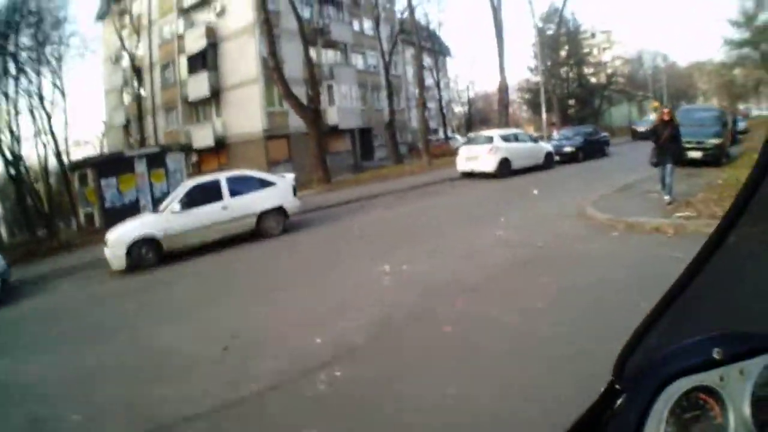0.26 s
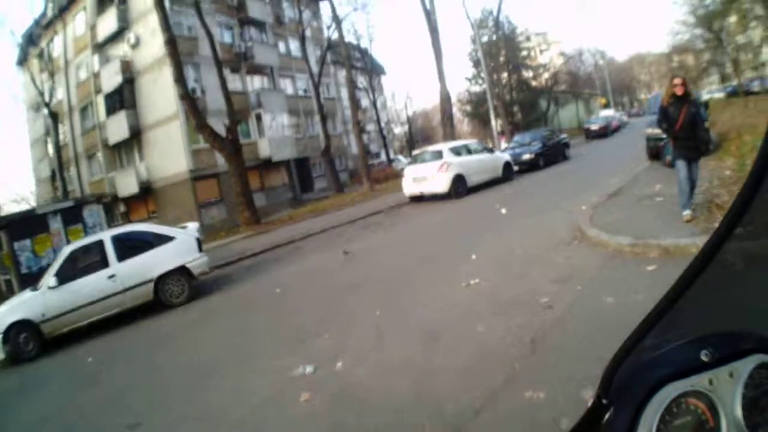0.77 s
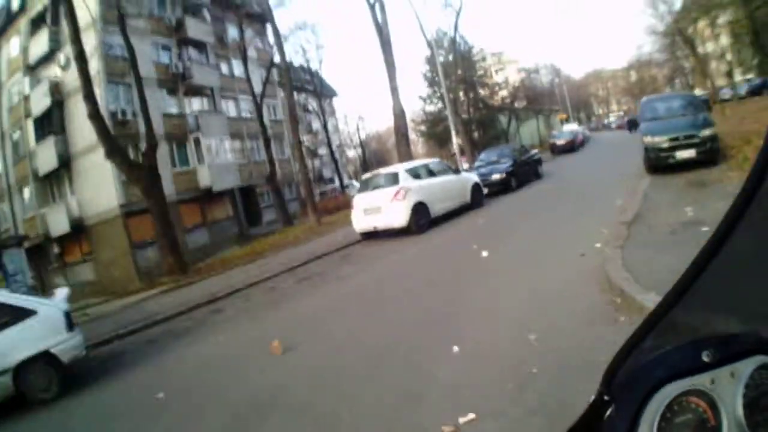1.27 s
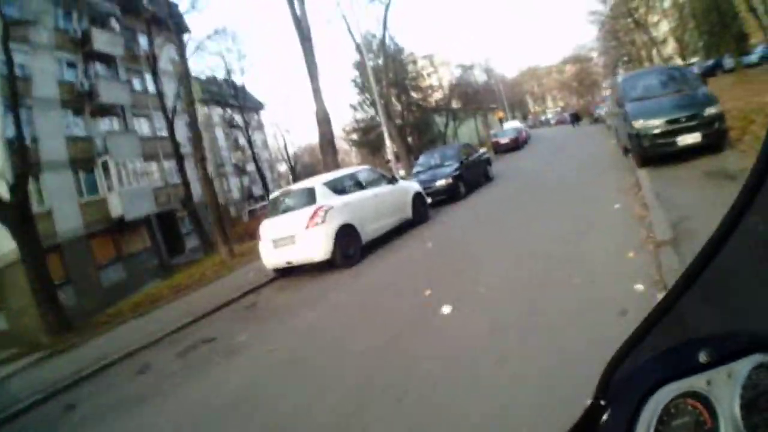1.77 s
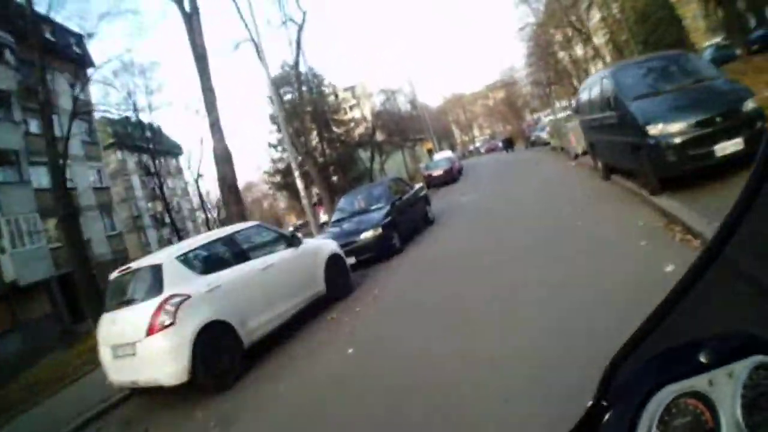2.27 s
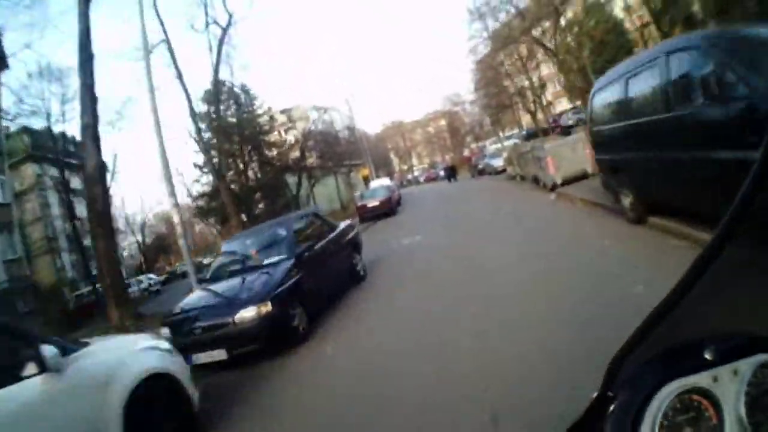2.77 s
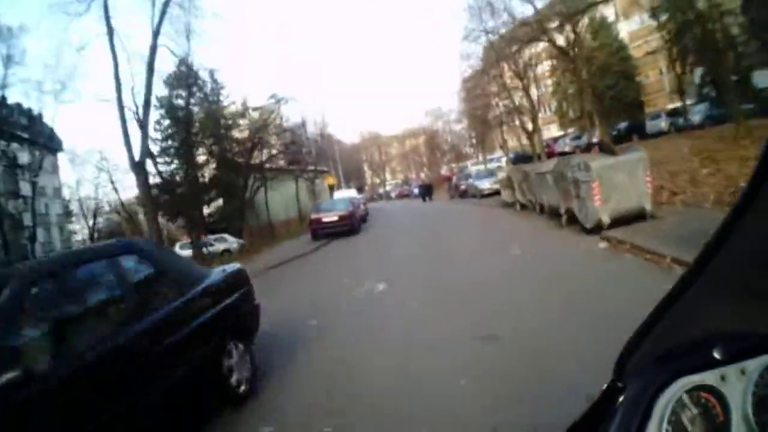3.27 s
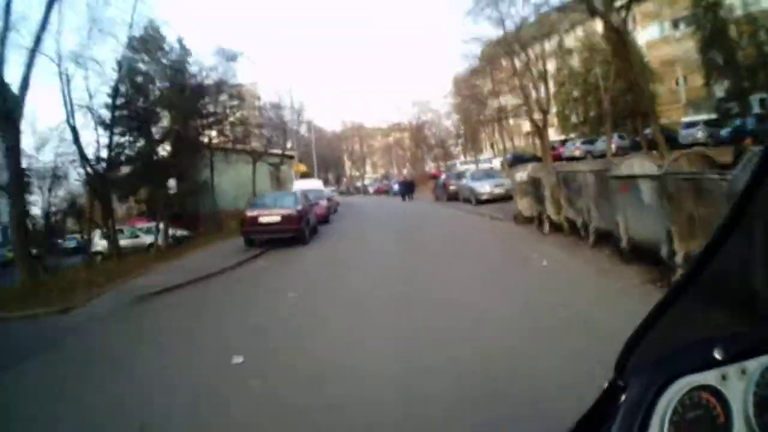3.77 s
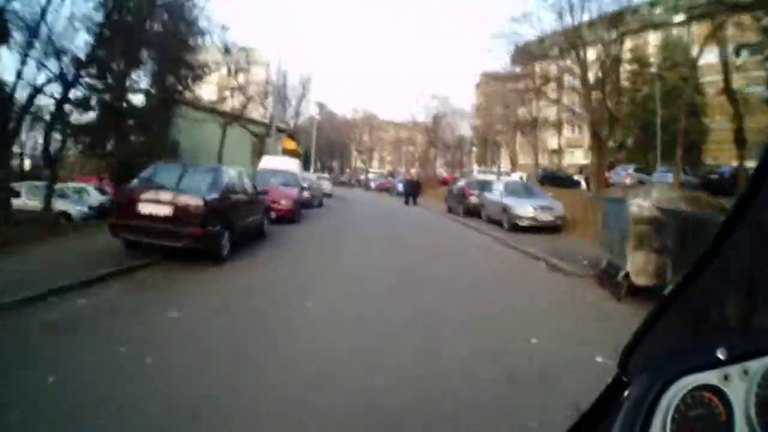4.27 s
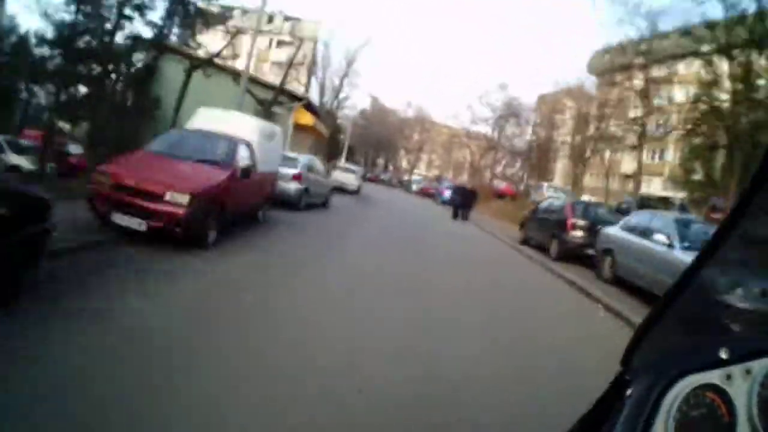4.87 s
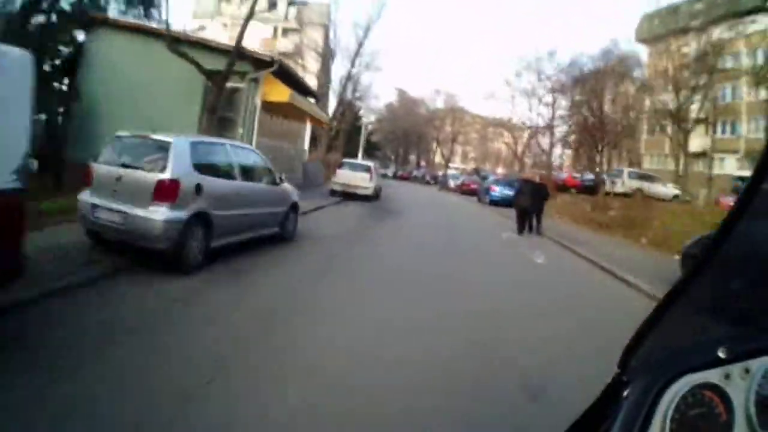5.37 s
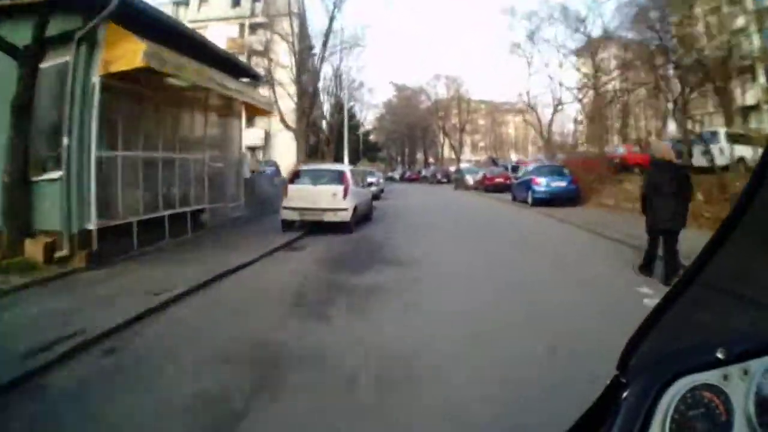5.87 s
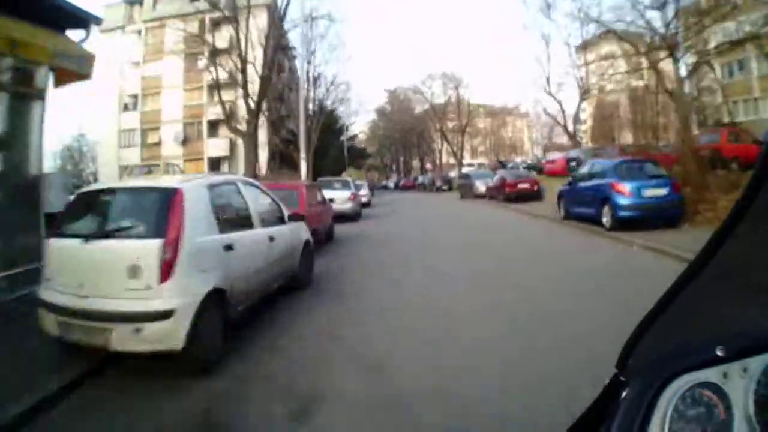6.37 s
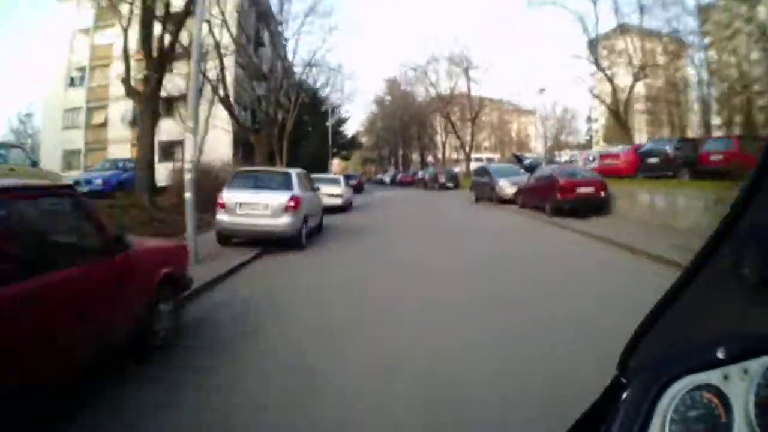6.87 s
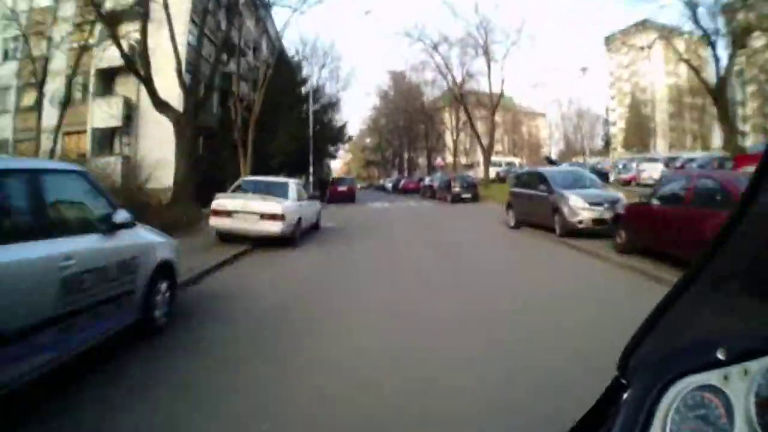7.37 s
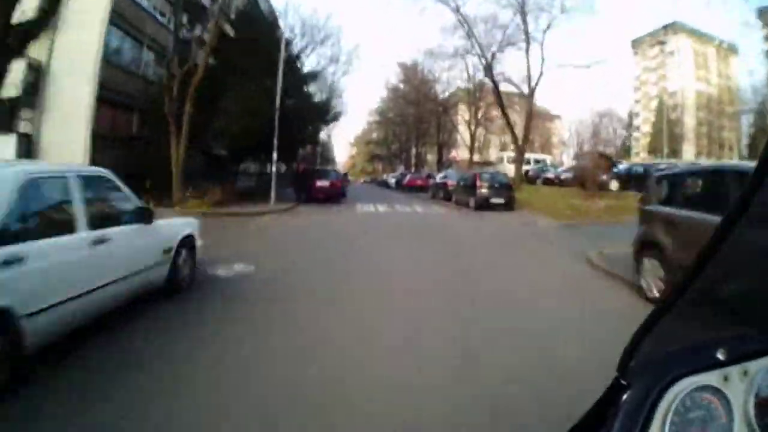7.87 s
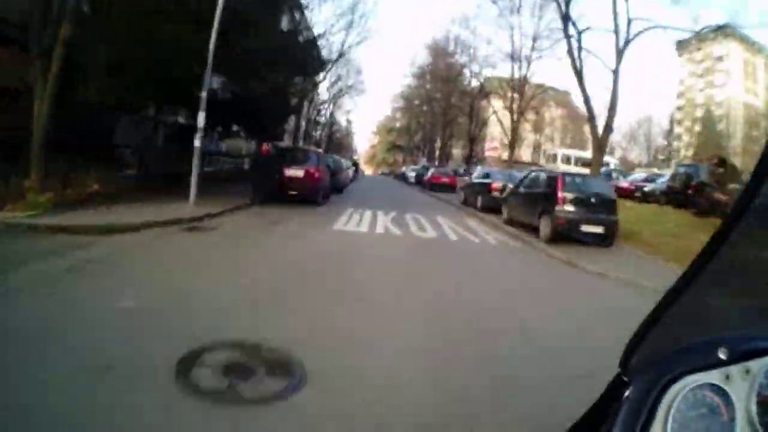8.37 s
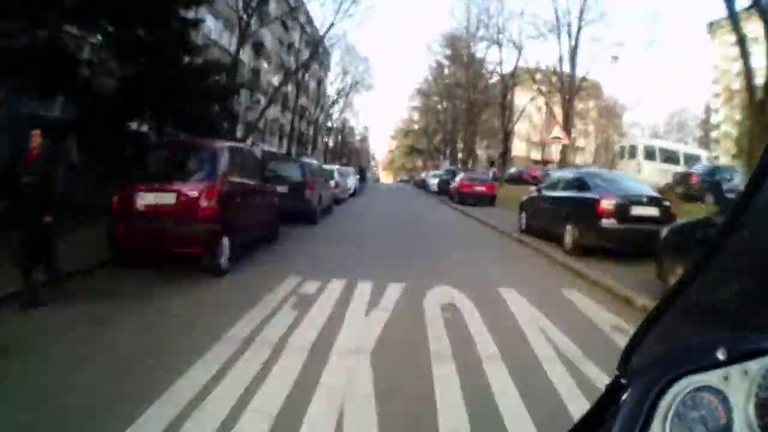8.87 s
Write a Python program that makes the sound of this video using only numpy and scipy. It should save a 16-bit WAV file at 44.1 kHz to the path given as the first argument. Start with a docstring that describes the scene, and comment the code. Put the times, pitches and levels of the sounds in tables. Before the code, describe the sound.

A single-cylinder motorcycle idles, clunks into gear and pulls away, its engine clattering and whining as wind buffets the microphone.

```python
"""On a street, from the rider's seat: a single-cylinder four-stroke motorcycle idles, clunks into gear
and pulls away. Each firing thumps through the pipe, the piston shakes the frame, the engine clatters
and rasps, and the gears whine hardest under load. The throttle shuts twice and a rough patch jolts
the bike. Wind buffets the microphone as speed builds, and the loudest peaks overload it."""
import sys
import numpy as np
from scipy import signal
from scipy.fft import rfft, irfft
from scipy.io import wavfile

SR = 44100
rng = np.random.default_rng(int(sys.argv[2]) if len(sys.argv) > 2 else 0)


def wav_out(sig):
    """Save sig, one row per channel (or a flat mono array), as 16-bit PCM at SR to the path in sys.argv[1]."""
    wavfile.write(sys.argv[1], SR, np.round(np.clip(np.atleast_2d(sig).T, -1, 1) * 32767).astype(np.int16))


N = 401751
TIME = np.arange(N) / SR
IDLE_RATE = 12.5  # firings per second; the crank turns twice for each firing


def amp(db):
    """Decibels to gain."""
    return 10 ** (np.asarray(db) / 20)


def unit_rms(x):
    """Scales to rms 1."""
    return x / np.sqrt(np.mean(x ** 2) + 1e-20)


def automation(rows):
    """Joins (seconds, value) rows into a curve, sample by sample."""
    return np.interp(TIME, *np.transpose(rows))


def colour(x, points):
    """Equalises by a curve of (Hz, dB) points; rms 1."""
    hz, db = np.transpose(points)
    f = np.fft.rfftfreq(len(x), 1 / SR)
    gain = amp(np.interp(np.log(f + 1), np.log(hz), db))
    return unit_rms(irfft(rfft(x) * gain, len(x)))


def wander(rate_hz):
    """Slow random drift of rms 1."""
    f = np.fft.rfftfreq(N, 1 / SR)
    return unit_rms(irfft(rfft(rng.standard_normal(N)) / (1 + (f / rate_hz) ** 4), N))


def resonate(x, hz, width_hz):
    """Two passes through a resonance whose pitch may glide."""
    turn = np.exp(2j * np.pi * np.cumsum(hz * np.ones(len(x))) / SR)
    pole = np.exp(-np.pi * width_hz / SR)
    for _ in range(2):
        x = 2 * (turn * signal.lfilter([1 - pole], [1, -pole], x / turn)).real
    return x


def nearness(hz, centre_hz, width_hz):
    """1 at the centre of a resonance, falling to 0 away from it."""
    return 1 / (1 + (2 * (hz - centre_hz) / width_hz) ** 2)


def strike(start, db, t60):
    """A hit's envelope: instant attack, then 60 dB of decay in t60 seconds."""
    return (TIME >= start) * amp(db - 60 * np.maximum(TIME - start, 0) / t60)


def loudness(law, rate, throttle):
    """A source's level in dB, rising with engine speed and with throttle."""
    idle_db, speed_db, throttle_db = law
    return idle_db + speed_db * (rate - IDLE_RATE) + throttle_db * throttle


def exhaust(cycles, rate, level_db, pull, count=44):
    """The firing pulses as a stack of harmonics, each swelling as it glides through a pipe resonance."""
    # The pipe's broad resonances. Each row: frequency in Hz, gain in dB.
    pipe = [(25, -8), (70, -14), (105, -6), (138, 1), (172, 0), (205, -11), (275, -6), (345, -2),
            (385, -11), (430, -8), (490, -12), (550, -8), (660, -14), (780, -12), (900, -15), (1500, -22)]
    # Sharp resonances that boom under load. Each row: centre in Hz, width in Hz, level in dB.
    booms = [(134.3, 10, -22.5), (170.7, 10, -24), (282, 12, -27), (325, 28, -25), (551, 26, -31.5),
             (774, 35, -33)]
    # Odd harmonics fade as the engine smooths out. Each row: firings per second, gain in dB.
    odd_fade = [(27, -0.5), (32, -7)]
    pipe_hz, pipe_db = np.transpose(pipe)
    odd_gain = amp(np.interp(rate, *np.transpose(odd_fade)))
    stack, boom, power = np.zeros((3, N))
    # the lowest four harmonics stay in step with the crank; the pipe scatters the higher ones
    phases = rng.random(count) * (np.arange(count) > 3)
    for order, phase in enumerate(phases, 1):
        gain = np.interp(order * rate, pipe_hz, amp(pipe_db))
        boom_gain = sum(amp(db) * nearness(order * rate, hz, width) for hz, width, db in booms)
        tone = np.sin(2 * np.pi * (order * cycles + phase)) * (odd_gain if order % 2 else 1)
        stack += gain * tone
        boom += np.sqrt(2) * boom_gain * tone
        power += gain ** 2 / 2
    return (amp(level_db) * stack / np.sqrt(power) + np.maximum(pull, 0) * boom) * amp(wander(13))


def piston_shake(cycles, rate, throttle, pull, throttle_db=3, overrun_db=11):
    """The unbalanced piston drones at once and twice crank speed, loudest where the frame resonates."""
    # How the frame passes on the shake. Each row: frequency in Hz, gain in dB.
    frame = [(24, -41), (31, -28.5), (45, -36.5), (53, -30.5), (61, -25), (70, -24), (80, -38), (102, -34),
             (125, -23), (142, -29)]
    hz, db = np.transpose(frame)
    crank_angle, crank_hz = 4 * np.pi * cycles, 2 * rate
    first_db = np.interp(crank_hz, hz, db) + throttle_db * throttle
    second_db = np.interp(2 * crank_hz, hz, db) + 3 + overrun_db * np.maximum(-pull, 0)
    drone = amp(first_db) * np.sin(crank_angle) + amp(second_db) * np.sin(2 * crank_angle)
    return np.sqrt(2) * drone * amp(0.73 * wander(7))


def knocks(cycles, t60, spread_db=3):
    """Piston slap and valve knocks each ring their own dense casing modes, never twice equally hard."""
    # Each row: position as a share of the cycle, relative level in dB.
    hits = [(.06, -3.5), (.31, -4.5), (.56, -2), (.81, -8)]
    t = np.arange(SR // 10) / SR
    knocking = np.zeros(N)
    for share, db in hits:
        ring = rng.standard_normal(len(t)) * amp(db - 60 * t / t60)
        count = np.floor(cycles - share)
        clicks = np.diff(count, prepend=count[0]) * amp(spread_db * rng.standard_normal(N))
        knocking += signal.oaconvolve(clicks, ring)[:N]
    return unit_rms(knocking)


def stroke_surge(cycles, running, punch):
    """The envelope that pumps the mechanical noise through each four-stroke cycle."""
    # Each row: share of the cycle, idling accent in dB, running accent in dB.
    accents = [(0, -7, -1), (.1, -1, 4), (.24, 3.5, 1), (.38, 2, -1.5), (.55, 0, .5), (.72, .5, -1.5),
               (.87, -3, -3)]
    share, idle_db, run_db = np.transpose(accents)
    idling, pulling = (np.interp(cycles, share, db, period=1) for db in (idle_db, run_db))
    crank_ripple = 0.26 * np.cos(4 * np.pi * (cycles - .06))
    return unit_rms(amp((0.5 - running) * idling + running * punch * (pulling - crank_ripple)))


def clatter(cycles, running, surge, level_db):
    """Knocks and surging mechanical noise; the tone fills out as the revs rise."""
    # The engine's tone idling and running. Each row: frequency in Hz, gain in dB.
    idle_eq = [(100, 5), (160, -12.5), (290, -1), (360, -16.5), (440, -0.5), (640, -12.5), (820, -5.5),
               (950, -2.5), (1200, -2), (1500, -9), (2000, -8.5), (2700, -12), (3300, -21), (5000, -65)]
    run_eq = [(150, -5.5), (300, -1), (480, -1), (660, -1), (780, 1), (860, -0.5), (1200, 2.5), (1650, -2),
              (2000, -4), (2380, -2.5), (2900, -7), (3400, -27.5), (5000, -33.5)]
    grit = rng.standard_normal(N) * amp(wander(130))
    drive = surge * (grit + amp(-5) * knocks(cycles, t60=0.11))
    body = np.sqrt(1 - running) * colour(drive, idle_eq) + np.sqrt(running) * colour(drive, run_eq)
    return amp(level_db) * body


def valve_rasp(cycles, surge, level_db):
    """Bright valve ticks in a gritty hiss."""
    # The rasp's treble band. Each row: frequency in Hz, gain in dB.
    rasp_eq = [(2000, -16.5), (3000, 0.5), (3700, -2), (4150, 4), (4600, 0), (5100, -2), (5500, -15.5),
               (6200, -19.5)]
    hiss = surge * rng.standard_normal(N) * amp(2.38 * wander(180))
    valves = amp(-10.5) * knocks(cycles, t60=0.023)
    return amp(level_db + 1.24) * colour(hiss + valves, rasp_eq)


def gear_whine(cycles, rate, pull, slip, punch, level_db):
    """Meshing teeth whine with the crank, loudest under load; hard power strokes make them chirp."""
    teeth_per_turn, case_hz = 37.93, 1160  # the case's own ring holds the pitch up at idle
    slip_sag, chirp, waver = .14, .06, .007  # shares of the pitch
    stroke_angle = 2 * np.pi * (cycles - .12)
    mesh_hz = np.maximum(case_hz, teeth_per_turn * 2 * rate * (1 - slip_sag * slip))
    hz = mesh_hz * (1 + chirp * punch * np.sin(stroke_angle + 2 * np.pi * .15) + waver * wander(15))
    load_db = np.interp(pull, [0, .35], [-7.5, 0])  # from coasting until the slack is taken up
    fade_db = -0.4214 * (rate - IDLE_RATE)
    flare_db = 2.9 * nearness(mesh_hz, centre_hz=2330, width_hz=43)  # passing a ring of the casing
    tone = resonate(rng.standard_normal(N), hz, width_hz=270)
    throb = amp(5 * punch * np.cos(stroke_angle))
    return amp(level_db + load_db + fade_db + flare_db) * unit_rms(tone * throb)


def wind():
    """Lumpy low buffeting that grows with road speed."""
    # Airflow over the microphone. Each row: time in seconds, level in dB.
    airflow = [(0, -43.5), (1.5, -33.5), (3.4, -27.5), (4.4, -16.5), (5.2, -14.5), (6.1, -20), (7.4, -16.5),
               (9.11, -17.5)]
    # The wind's rumble. Each row: frequency in Hz, gain in dB.
    wind_eq = [(10, -5.5), (28, -1), (45, -3), (80, -1), (150, -4), (260, -5.5), (450, -10.5), (900, -21.5),
               (2000, -27.5), (5000, -53.5)]
    return amp(automation(airflow) + wander(12)) * colour(rng.standard_normal(N), wind_eq)


def metal_ticks():
    """Loose metal parts tap lightly at idle."""
    # Each row: start in seconds, level in dB.
    taps = [(.555, -30), (.719, -30), (.989, -25), (1.012, -29), (1.053, -29), (1.132, -23)]
    envelope = sum(strike(start, db, t60=0.022) for start, db in taps)
    return envelope * unit_rms(resonate(rng.standard_normal(N), hz=3000, width_hz=1200))


def gear_clunk():
    """The gear dogs catch and rattle the case."""
    # The blows of the dogs. Each row: start in seconds, relative level in dB, ring time in seconds.
    blows = [(1.249, -20, .03), (1.566, -15, .12), (1.59, -22, .04)]
    # The gearbox case's resonances. Each row: centre in Hz, width in Hz, relative gain in dB.
    case_modes = [(324, 91, 15.5), (610, 180, 8.5), (1180, 360, 15), (2400, 970, -30)]
    envelope = sum(strike(start, db + 1, t60) for start, db, t60 in blows)
    noise = rng.standard_normal(N)
    return envelope * unit_rms(sum(amp(db) * resonate(noise, hz, width) for hz, width, db in case_modes))


def scene():
    """One crankshaft drives the engine's layers; the clunk, ticks and wind play over them."""
    # Engine speed. Each row: time in seconds, firings per second.
    revs = [(0, 13.68), (.6, 11.97), (1.6, 12.9), (1.95, 15.43), (2.04, 19.5), (2.48, 19.79), (2.81, 23.42),
            (3.66, 25.66), (5.15, 35.95), (5.52, 23.62), (5.7, 20.48), (5.86, 25.82), (6.19, 25.79),
            (7.7, 27.52), (8.17, 27.56), (8.69, 16.66), (8.86, 20.11), (9.11, 21.97)]
    # The rider's hand. Each row: time in seconds, throttle from 0 shut to 1 wide open.
    twist_grip = [(1.5, 0.13), (1.85, 0.1), (2.58, 0.25), (2.7, 0.42), (4.3, 0.84), (5.13, 0.83),
                  (5.42, 0.23), (5.72, 0), (5.81, 0.39), (8.15, 0.46), (8.32, .04), (8.7, 0.024),
                  (8.84, 0.29)]
    # How hard the power stroke stands out. Each row: time in seconds, emphasis from 0 to 1.
    stroke_emphasis = [(3, 0.97), (3.7, 0.38), (5, 0.75), (5.4, 0.19)]
    # Loudness laws. Each: base level in dB, dB per extra firing a second, dB added by full throttle.
    clatter_law = (-24, 0.23, 8.73)
    rasp_law = (-37.5, 0.39, 7.6)
    exhaust_law = (-30.5, 0.45, 3)
    rate, throttle, punch = automation(revs), automation(twist_grip), automation(stroke_emphasis)
    cycles = np.cumsum(rate * (1 + .004 * wander(15))) / SR - .5
    running = np.clip((rate - 13.5) / 10.5, 0, 1)  # 0 idling, 1 revved up

    bite_at_s, bite_length_s, locked_at_s = 1.67, 0.11, 2.87
    clutch = np.clip((TIME - bite_at_s) / bite_length_s, 0, 1)
    slip = clutch * np.interp(TIME, [bite_at_s, locked_at_s], [1, 0])
    # more throttle than holds the speed pulls; less lets the bike push the engine
    holding_throttle = 0.023 * (rate - IDLE_RATE)
    pull = clutch * np.clip((throttle - holding_throttle) / 0.38, -1, 1)
    jolt = np.exp(-((TIME - 6.5) / 0.077) ** 2)  # a rough patch of road: extra rattle and buffeting

    clatter_db = loudness(clatter_law, rate, throttle)
    rasp_db = loudness(rasp_law, rate, throttle) - 10 * (1 - clutch)
    exhaust_db = loudness(exhaust_law, rate, throttle) - 7 * (1 - clutch)
    surge = stroke_surge(cycles, running, punch)
    engine = exhaust(cycles, rate, exhaust_db, pull)
    engine += amp(3 * slip) * piston_shake(cycles, rate, throttle, pull)
    rattle = clatter(cycles, running, surge, clatter_db) + valve_rasp(cycles, surge, rasp_db)
    engine += amp(3 * jolt) * rattle
    whine_cycles = cycles - 0.15 * (1 - running)  # at idle the whine swells later in the cycle
    engine += gear_whine(whine_cycles, rate, pull, slip, punch, clatter_db + 8.5 * slip)
    return (engine + gear_clunk() + metal_ticks() + amp(5.5 * jolt) * wind())[None]


def low_pass(x, hz):
    """A steep band limit."""
    return signal.oaconvolve(x, signal.firwin(301, hz, window=("kaiser", 9), fs=SR)[None], "same")


def record(dry, headroom=1.233, ceiling=.72):
    """A narrow-band microphone rounds off peaks; the loudest clip flat, with faint treble crackle."""
    rounded = low_pass(headroom * np.tanh(dry / headroom), hz=5900)
    return low_pass(np.clip(rounded, -ceiling, ceiling), hz=15800)


dry = scene()
out = record(dry)
wav_out(out)
```